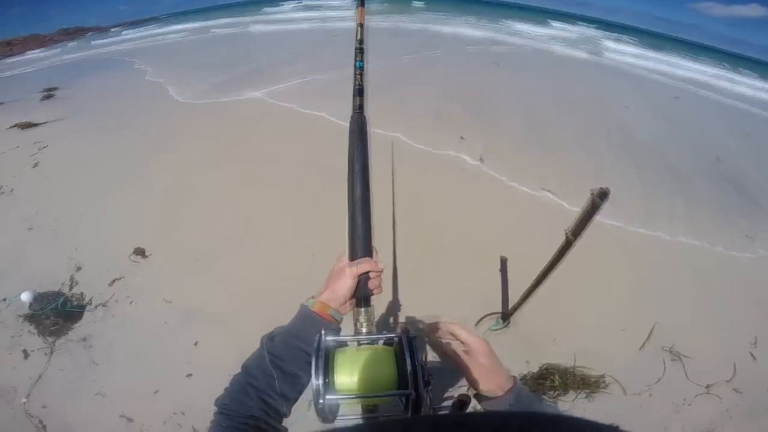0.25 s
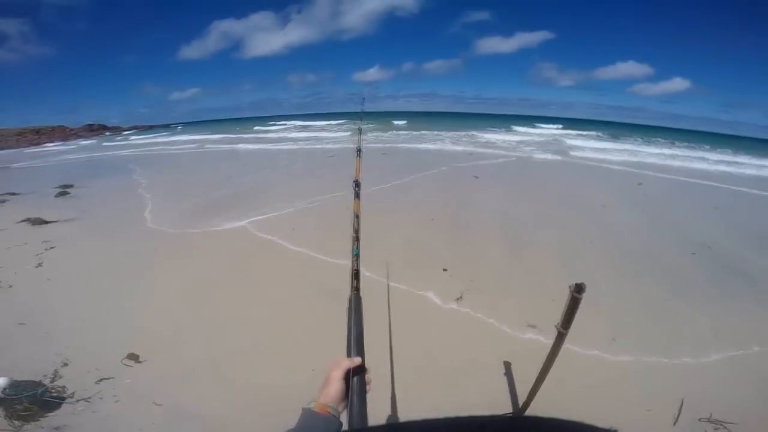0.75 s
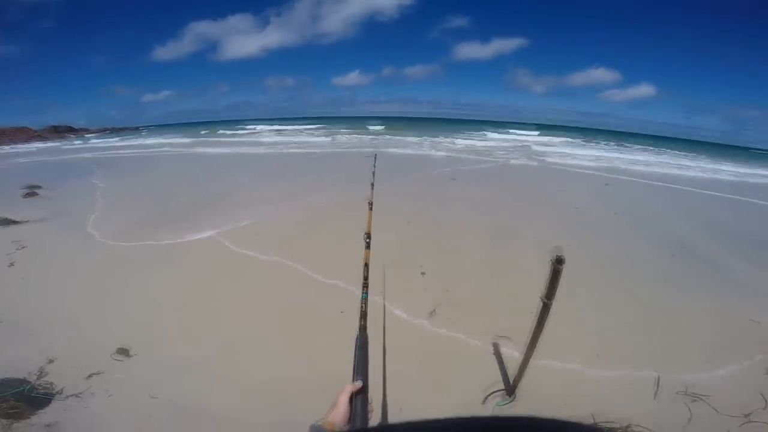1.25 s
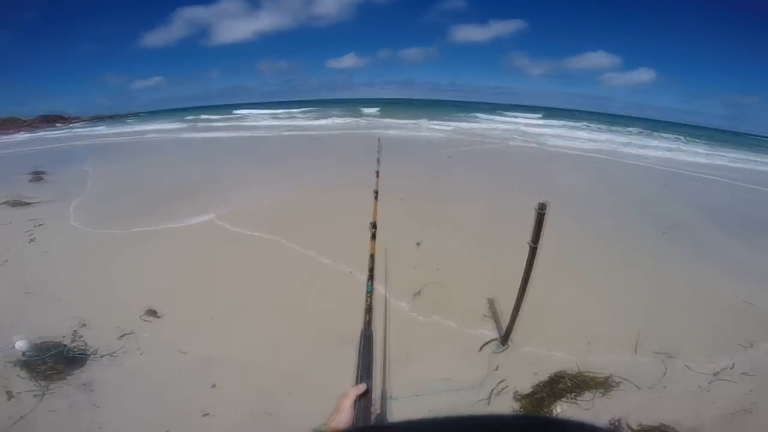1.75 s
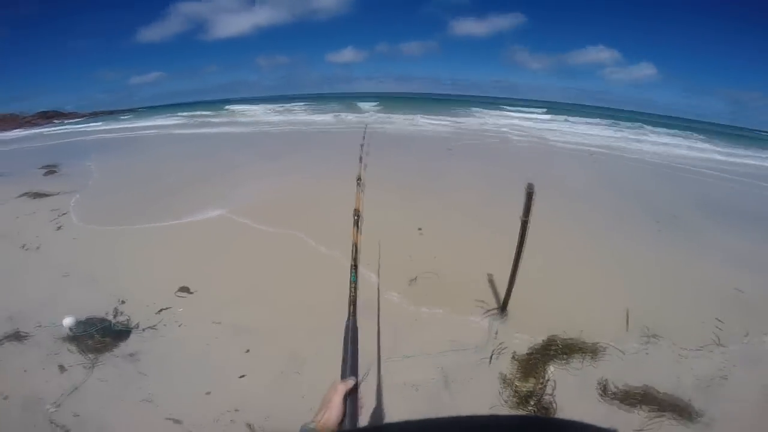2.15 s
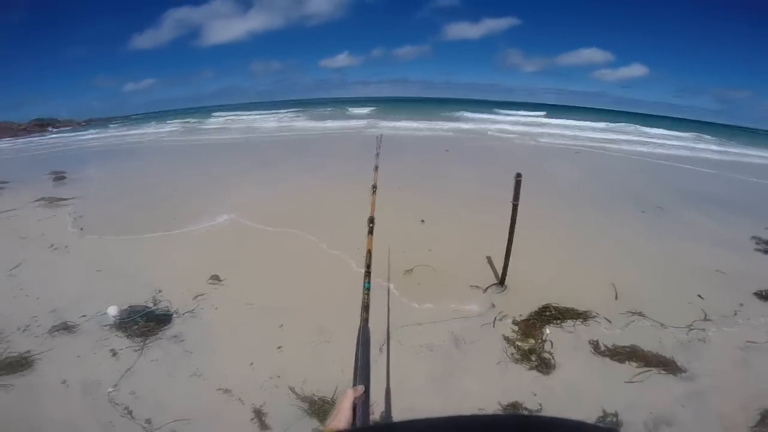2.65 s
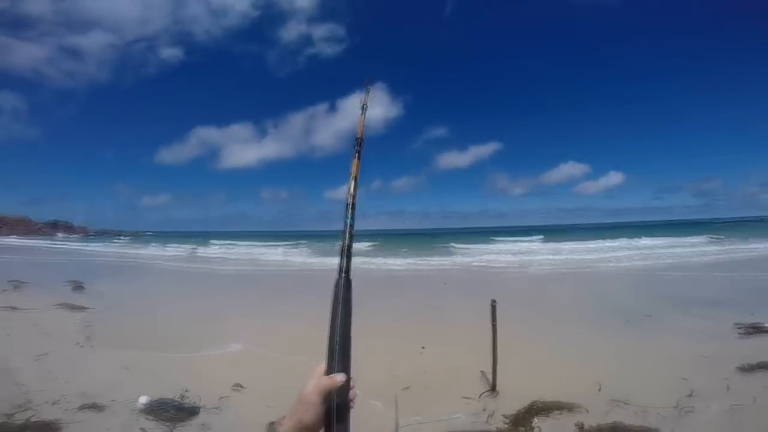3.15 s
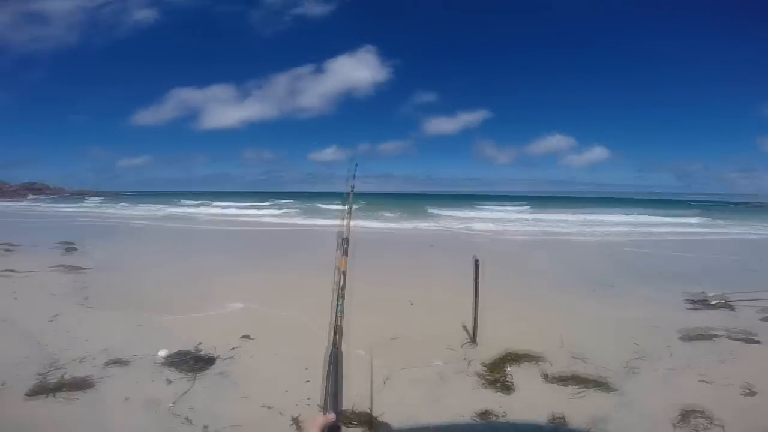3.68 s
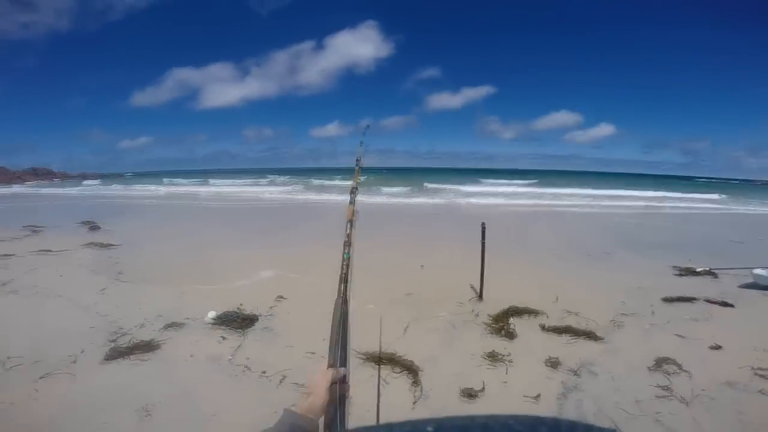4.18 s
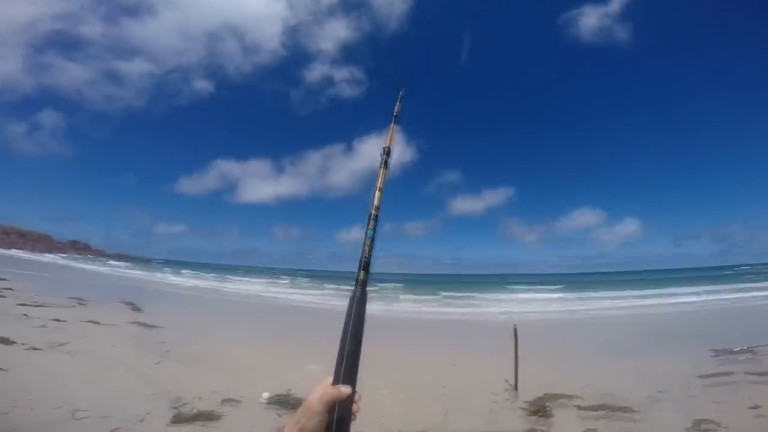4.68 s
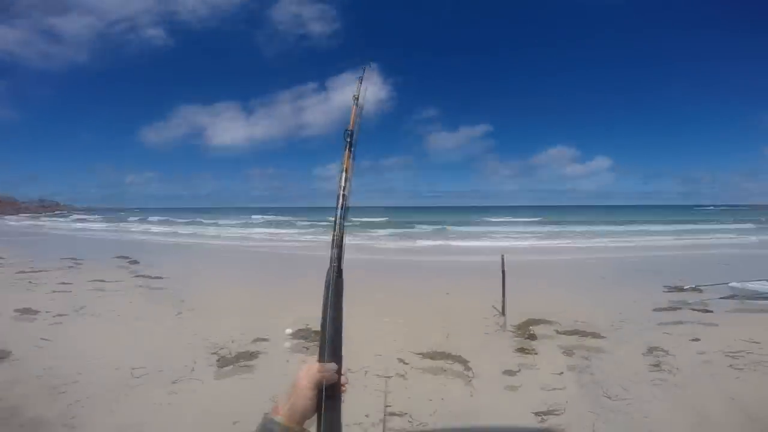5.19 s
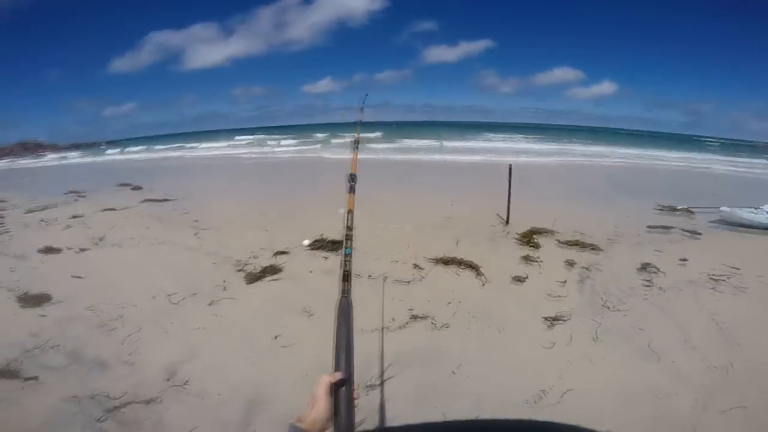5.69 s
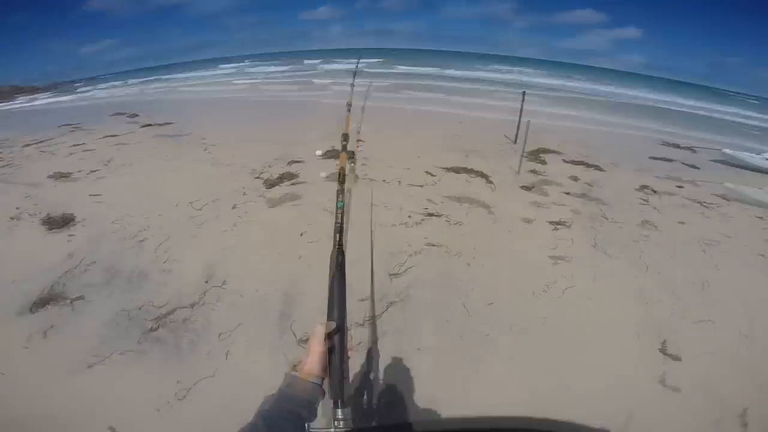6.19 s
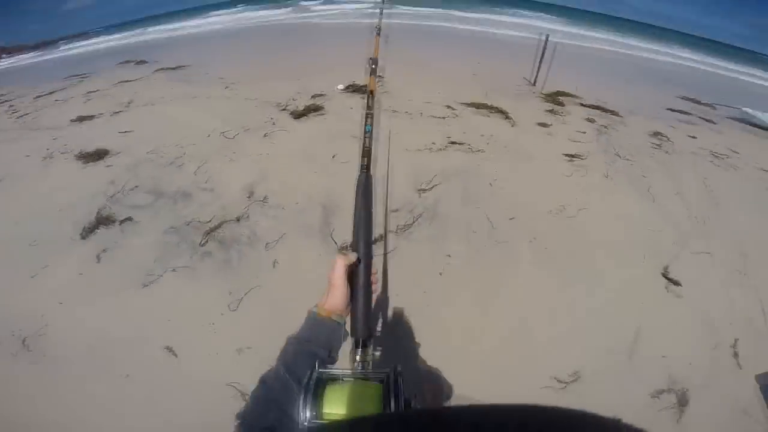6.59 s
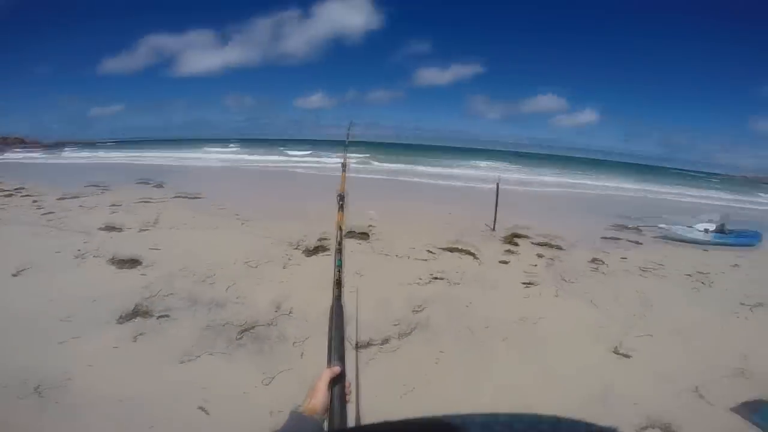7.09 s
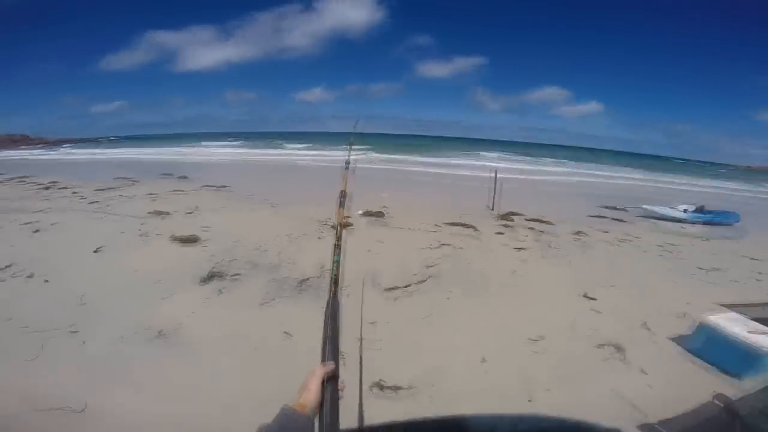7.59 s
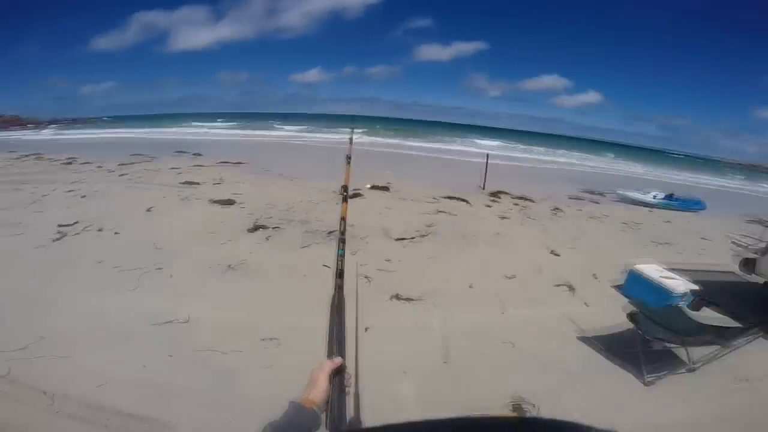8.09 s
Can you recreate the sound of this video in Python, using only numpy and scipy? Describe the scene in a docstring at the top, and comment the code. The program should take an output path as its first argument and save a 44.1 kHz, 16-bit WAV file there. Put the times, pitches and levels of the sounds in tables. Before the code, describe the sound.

On an open windy beach, a big metal fishing reel whirrs briefly and brakes to a stop. After a short gap, its clicker buzzes in uneven pulls, each rising and easing, with pauses in the middle. Rod knocks thud and clack, tackle ticks and a sleeve rasps near a body-worn microphone. Low wind gusts and steady, faint surf hiss lie behind, with no echo.

```python
"""Sea reel on a windy beach

A big reel spins freely and is braked, then line is drawn off it in separate pulls. A pawl snaps over an
off-centre ratchet wheel and rings rim, side plates and spool; the plates swell once per turn.
The rod butt knocks against the angler's body as he walks backwards, tackle ticks, and a sleeve rubs close
to the microphone. Shaped noise gives the wind rumble, the flapping jacket and the surf hiss behind."""
import sys
import numpy as np
from scipy import signal
from scipy.fft import rfft, irfft
from scipy.io import wavfile

SR = 44100
rng = np.random.default_rng(int(sys.argv[2]) if len(sys.argv) > 2 else 0)


def wav_out(sig):
    """Save sig, one row per channel (or a flat mono array), as 16-bit PCM at SR to the path in sys.argv[1]."""
    wavfile.write(sys.argv[1], SR, np.round(np.clip(np.atleast_2d(sig).T, -1, 1) * 32767).astype(np.int16))


N = 367794
TIME = np.arange(N) / SR  # s

# rumble through cloth: (frequency [Hz], relative density [dB])
JACKET_COLOUR = [(60, 3), (130, 0.5), (200, -3.5), (260, 4.5), (340, -15.5), (500, -19), (900, -26),
                 (2000, -66)]


def from_db(db):
    """Decibels to amplitude gain."""
    return 10 ** (np.asarray(db) / 20)


def rms_one(x):
    """Scale to unit power."""
    return x / np.sqrt(np.mean(x ** 2) + 1e-20)


def in_time(rows):
    """Interpolate each column of a time table at every sample."""
    s, *columns = np.transpose(rows)
    return [np.interp(TIME, s, column) for column in columns]


def drift(knots_per_s):
    """Random curve: straight lines between normal knots of spread 1."""
    knots = rng.standard_normal(6000)
    return np.interp(TIME * knots_per_s, np.arange(len(knots)), knots)


def noise(colour):
    """Noise of unit power with the given spectrum and steep skirts beyond its ends."""
    hz, db = np.transpose(colour)
    f = np.maximum(np.arange(N // 2 + 1) * SR / N, 1)
    low_skirt = 1 + (hz[0] / f / 2 ** .5) ** 8
    high_skirt = 1 + (f / hz[-1] / 2) ** 8
    gain = from_db(np.interp(np.log(f), np.log(hz), db)) / np.sqrt(low_skirt * high_skirt)
    return rms_one(irfft(rfft(rng.standard_normal(N)) * gain, N))


def impulses(times_s, sizes):
    """One impulse at each time."""
    index = np.round(np.asarray(times_s) * SR).astype(int)
    return np.bincount(np.clip(index, 0, N - 1), sizes, N)


def fade(x, decay_s):
    """Every impulse dies away exponentially from its own height."""
    return signal.lfilter([1], [1, -np.exp(-1 / (decay_s * SR))], x + 1e-18)


def chatter(hits, decay_s):
    """Each hit spread into a dying burst of micro-contacts of the same mean energy."""
    return rng.standard_normal(N) * np.sqrt(fade(hits ** 2, decay_s) / (decay_s * SR))


def resonate(x, modes):
    """Parallel two-pole resonances with alternating signs."""
    out = 0
    for k, (hz, width_hz, db) in enumerate(modes):
        r = np.exp(-np.pi * width_hz / SR)
        poles = [1, -2 * r * np.cos(2 * np.pi * hz / SR), r * r]
        gain = (-1) ** k * from_db(db) * (1 - r * r) / 2
        out = out + gain * signal.lfilter([1, 0, -1], poles, x + 1e-18)
    return out


def ring(x, modes, vary_db):
    """Resonances scaled to unit energy per unit impulse; the drive of each mode drifts separately."""
    out = 0
    for k, mode in enumerate(modes):
        drive = x * from_db(vary_db * drift(45))
        out = out + (-1) ** k * resonate(drive, [mode])
    return out / np.linalg.norm(resonate(signal.unit_impulse(SR // 10), modes))


def strike(x, modes):
    """Resonances in which a unit impulse rings with peak 1."""
    return resonate(x, modes) / np.abs(resonate(signal.unit_impulse(SR // 10), modes)).max()


def beach(jacket_db=-37, jacket_follows=0.4):
    """Lumpy wind on the port, the jacket flapping with the gusts, and nearly steady surf."""
    # wind strength on the port: (time [s], relative level [dB])
    gusts = [(0, -40.5), (.65, -35), (1.3, -35.5), (1.55, -27.5), (2.7, -34), (3.6, -34.5), (3.95, -23.5),
             (4.47, -41.5), (4.54, -19.5), (4.62, -19), (4.7, -30), (5.12, -44.5), (5.43, -25), (5.56, -42),
             (6.35, -24.5), (6.9, -33), (7.35, -28.5), (7.62, -36.5), (7.82, -21), (8, -38), (8.34, -29)]
    # surf: (time [s], level [dB])
    surf = [(0, -48), (.8, -51.5), (3.3, -51), (5.1, -52), (8.34, -48.5)]
    # spectra: (frequency [Hz], relative density [dB])
    wind_colour = [(20, 6.5), (35, -4), (50, -10.5), (70, -19.5), (110, -31.5), (200, -46.5), (500, -60)]
    surf_colour = [(300, -2), (500, -8.5), (900, -11), (1500, -9), (2200, -6.5), (3100, -7), (3900, -17),
                   (4700, -21), (5400, -15), (6300, -15.5), (7500, -26.5), (10000, -28.5), (12500, -34),
                   (15000, -40)]
    gust_db, = in_time(gusts)
    surf_db, = in_time(surf)
    wind = from_db(gust_db + 2.5) * noise(wind_colour)
    flap_db = jacket_db + jacket_follows * gust_db + 5.5 * drift(35)
    return wind + from_db(flap_db) * noise(JACKET_COLOUR) + from_db(surf_db) * noise(surf_colour)


def sleeve():
    """Cloth slides in short strokes: a grainy rasp, and a rumble through the jacket."""
    # strokes of sleeve and hand: (time [s], Gaussian half length [s], rasp level [dB], rumble level [dB])
    rubs = [(0.272, 0.0043, -30.5, -50), (0.344, .004, -44, -53), (3.176, 0.033, -46, -36.5),
            (3.284, 0.0066, -45, -44), (3.341, 0.017, -47, -53), (4.53, 0.036, -43.5, -42),
            (4.85, 0.014, -41, -39.5), (5.37, 0.066, -60, -43.5), (6.478, 0.015, -32, -29),
            (6.541, 0.015, -30.5, -35), (6.807, 0.018, -31, -39.5), (6.865, 0.0099, -21, -49),
            (7.33, 0.043, -40, -34.5)]
    # rasp spectrum: (frequency [Hz], relative density [dB])
    rub_colour = [(200, -19), (600, -19), (900, -11.5), (1500, -3), (2600, -1), (3300, -14.5), (5000, -24),
                  (14000, -49)]
    strokes = [np.exp(-.5 * ((TIME - s) / length_s) ** 2) for s, length_s, _, _ in rubs]
    rasp, rumble = from_db(np.array(rubs)[:, 2:].T) @ np.array(strokes)
    grain = from_db(3.5 * drift(600))
    return rasp * rms_one(noise(rub_colour) * grain) + rumble * noise(JACKET_COLOUR)


def ticks():
    """Small hard parts of the tackle touch and ring briefly."""
    # touches: (time [s], level [dB])
    touches = [(3.182, -47), (3.223, -37), (4.487, -22.5), (4.838, -43)]
    # tackle resonances: (frequency [Hz], width [Hz], relative level [dB])
    tick_modes = [(2880, 900, -2), (6520, 260, 10), (7640, 1000, -31.5)]
    s, db = np.transpose(touches)
    touch = impulses(s, from_db(db))
    return strike(touch + 0.5 * chatter(touch, 0.0019), tick_modes)


def knocks(soft_hz=1100, dull_hz=3600, slack_s=0.00069):
    """A padded push thuds through the body while the reel seat clacks twice in its play."""
    # rod knocks: (time [s], relative thud level [dB], relative clack level [dB])
    rod_knocks = [(1.571, -14, -20.5), (1.671, -16.5, -20), (1.937, -21, -32), (2.209, -9.5, -16.5),
                  (2.473, -14.5, -19), (3.527, -17.5, -33), (3.868, -6.5, -12.5), (4.002, -10.5, -19.5),
                  (4.057, -16, -25), (5.648, -20.5, -37), (6.2092, -2, -8), (6.327, -4.5, -7),
                  (6.459, -12.5, -33), (7.304, -18, -31), (7.441, -18, -26), (7.827, -6.5, -9),
                  (8.067, -21.5, -13.5), (8.072, -11, -34), (8.103, -10.5, -40)]
    # resonances of body and rod: (frequency [Hz], width [Hz], relative level [dB])
    thud_modes = [(48, 34.4, 9), (82, 42.6, 0.5), (156, 36, -10.5), (258.5, 79.5, -0.5), (388, 135, -9),
                  (566, 210, -14.5), (950, 240, -12.5)]
    clack_modes = [(970, 73, -46), (1620, 240, -3.5), (2200, 188, -0.5), (2445, 300, -3)]
    s, thud_db, clack_db = np.transpose(rod_knocks)
    push = impulses(s + 0.00055, from_db(thud_db))
    thud = strike(push + 0.19 * chatter(push, 0.014), thud_modes)
    thud = signal.sosfilt(signal.butter(2, soft_hz, fs=SR, output="sos"), thud)
    clack = impulses(s, from_db(clack_db)) + 0.22 * impulses(s + slack_s, from_db(clack_db))
    clack = clack + 0.65 * chatter(clack, 0.00021) + 0.47 * chatter(clack, 0.0082)
    clack = strike(clack, clack_modes)
    clack = signal.sosfilt(signal.butter(2, dull_hz, fs=SR, output="sos"), clack)
    return from_db(-2) * thud + from_db(2.5) * clack


def spin_teeth():
    """Tooth times [s] while the spool coasts; it is braked to rest on a tooth."""
    start_s, stop_s = .003, .283
    teeth_per_s, coast_teeth_per_s2, brake_teeth_per_s2 = 186, 79, 8000
    t = np.arange(start_s, stop_s, 1 / SR)
    coasting = teeth_per_s - coast_teeth_per_s2 * (t - t[0])
    braking = brake_teeth_per_s2 * (stop_s - t)
    turned = np.cumsum(np.minimum(coasting, braking)) / SR
    return np.interp(np.arange(round(turned[-1]) + 1), turned, t)


def pull_teeth(ease_s=.109):
    """Tooth times [s] of pulls that speed the spool up and ease off, each over a whole number of teeth."""
    # pulls, each until the next row; drive 0 stops the spool:
    # (time [s], speed at the start [teeth/s], drive [teeth/s], rise [s])
    pulls = [(0.853, 32, 79, 0.22), (1.091, 52, 115, 0.3), (1.269, 54, 131, 0.2), (1.435, 80, 112, 0.06),
             (1.564, 67, 127, 0.11), (1.829, 72, 120, 0.09), (2.082, 74, 123, 0.16), (2.354, 59, 165, 0.18),
             (2.486, 70, 109, 0.2), (2.65, 69, 97, 0.1), (2.972, 70, 111, 0.15), (3.149, 44, 0, 0),
             (3.412, 25, 97, 0.07), (3.579, 60, 165, 0.33), (3.846, 49, 119, 0.12), (4.136, 34, 127, 0.06),
             (4.344, 42, 0, 0), (5.17, 52, 78, 0.09), (5.283, 50, 104, 0.1), (5.594, 26, 103, 0.08),
             (5.732, 57, 112, 0.11), (5.943, 52, 131, 0.07), (6.202, 38, 135, 0.03), (6.438, 40, 138, 0.11),
             (6.696, 44, 114, 0.09), (6.989, 34, 117, 0.07), (7.255, 42, 113, 0.15), (7.567, 27, 112, 0.31),
             (7.932, 26, 122, 0.15), (8.253, 23, 133, 0.12), (8.335, 130, 0, 0)]
    times = []
    for (start, speed_in, drive, rise_s), (end, speed_out, next_drive, _) in zip(pulls, pulls[1:]):
        if drive > 0:
            t = np.arange(start, end, 1 / SR)
            progress = np.minimum([(t - start) / rise_s, (end - t) / ease_s], 1)
            rise, ease = np.sin(np.pi / 2 * progress)
            speeding_up = speed_in + (drive - speed_in) * rise
            easing_off = speed_out + (drive - speed_out) * ease
            turned = np.cumsum(np.minimum(speeding_up, easing_off)) / SR
            teeth = round(turned[-1])
            # the last tooth belongs to the next pull unless the spool stops
            count = np.arange(teeth + (next_drive == 0))
            times.append(np.interp(count / teeth, turned / turned[-1], t))
    return np.concatenate(times)


def drops(lead_s=.0003, wobble_db=2, wobble_s=.00013):
    """Pawl drop times [s] and strengths [dB]: both waver once per turn; a fast spool has less jitter."""
    wheel_teeth, high_tooth = 14, 11.5  # off-centre wheel: plates ring hardest at the high tooth
    runs = spin_teeth(), pull_teeth()
    at = np.concatenate(runs)
    tooth = np.concatenate([np.arange(len(run)) for run in runs])
    teeth_per_s = 1 / np.gradient(at)
    angle = 2 * np.pi * (tooth - high_tooth) / wheel_teeth
    jitter_s = np.interp(teeth_per_s, [60, 110, 160], [.00025, .0001, .00002])
    late_s = wobble_s * np.sin(angle) + jitter_s * rng.standard_normal(len(at))
    return at - lead_s + late_s, wobble_db * np.cos(angle)


def scatter(x):
    """Waves run to and fro in the metal frame and smear every snap in the same way (all-pass loops)."""
    # round trips in the frame: (delay [s], share sent round again [ratio])
    frame_paths = [(.00014, .55), (.00034, .5), (.00077, -.3)]
    for delay_s, share in frame_paths:
        loop = np.r_[1, np.zeros(round(delay_s * SR) - 1), -share]
        x = signal.lfilter(loop[::-1], loop, x + 1e-18)
    return x


def snaps(at, size, chatter_s, rattle_s, rattle):
    """A snap alike on every tooth plus chatter and loose rattle; at speed the pawl settles to a cleaner whine."""
    teeth_per_s = 1 / np.gradient(at)
    loose = np.interp(teeth_per_s, [90, 130, 170], [.57, .48, .32])
    alike = impulses(at, size * np.sqrt(1 - loose ** 2))
    stray = impulses(at, size * loose)
    return scatter(alike + chatter(stray, chatter_s)) + rattle * chatter(stray, rattle_s)


def ratchet(uneven_db=0.45, lag_s=.0005, hard_db=-33, bright_hz=9000):
    """Each drop of the pawl rings the rim at once, the side plates and the spool a moment later."""
    # relative levels at 100 teeth/s; rim brightest when the reel swings out before the microphone:
    # (time [s], side plates [dB], rim [dB], spool [dB])
    pawl = [(.2, -45, -34, -52.5), (.9, -46.5, -42.5, -43), (1.12, -45.5, -42.5, -44),
            (1.24, -38.5, -41.5, -44.5), (2, -35.5, -41, -48.5), (2.85, -39.5, -40.5, -45),
            (3.5, -33.5, -40, -46.5), (4.1, -36, -41.5, -46), (5.3, -33, -38, -50), (5.7, -34.5, -40, -48),
            (6.3, -34, -40, -49.5), (6.6, -37, -34, -46.5), (6.9, -35, -39.5, -47),
            (8.3, -35, -40.5, -47.5)]
    # reel resonances: (frequency [Hz], width [Hz], relative level [dB])
    plate_modes = [(1191, 163, -4.5), (1561, 179, 1.5), (1772, 166, 2.5), (2288, 163, -1), (2673, 142, -3)]
    rim_modes = [(2835, 185, 2.5), (3186, 360, -2), (3662, 60, 2.5), (4170, 230, -2.5), (4546, 47, -2),
                 (5320, 255, -1), (5620, 106, -4), (6178, 245, 1), (6640, 90, -13.5), (8040, 100, -14),
                 (9400, 780, -13), (9610, 260, -6.5), (11050, 2900, -20), (12930, 450, -16.5),
                 (14550, 1000, -28)]
    spool_modes = [(998.3, 49, 7.5), (1090, 132, 0.5)]
    at, turn_db = drops()
    s, plate_db, rim_db, spool_db = np.transpose(pawl)
    force = np.sqrt(SR / 100) * from_db(uneven_db * rng.standard_normal(len(at)))
    plate = force * from_db(np.interp(at, s, plate_db) + turn_db)
    rim = force * from_db(np.interp(at, s, rim_db))
    spool = force * from_db(np.interp(at, s, spool_db))

    rim_snap = snaps(at, rim, chatter_s=0.0024, rattle_s=0.0021, rattle=1.0)
    # a harder snap has a shorter contact, and so more top
    hardness = from_db(np.interp(TIME, s, rim_db) - hard_db) ** 2
    top = signal.sosfilt(signal.butter(1, bright_hz, "high", fs=SR, output="sos"), rim_snap)
    rim_ring = ring(rim_snap + 0.55 * hardness * top, rim_modes, vary_db=2.0)

    plate_snap = snaps(at + lag_s, plate, chatter_s=0.0011, rattle_s=0.005, rattle=0.68)
    plate_ring = ring(plate_snap, plate_modes, vary_db=1.35)

    spool_snap = snaps(at + lag_s, spool, chatter_s=0.012, rattle_s=0.016, rattle=0.62)
    spool_hum = ring(spool_snap, spool_modes, vary_db=0.0)
    return plate_ring + 0.82 * rim_ring + spool_hum


def scene():
    """Sum of all sources in the open air, without echo; one channel."""
    return (beach() + sleeve() + ticks() + knocks() + ratchet())[None]


def record(dry):
    """The highest peaks are rounded and the top is cut."""
    ceiling, cutoff_hz = .95, 15600
    rounded = dry / (1 + (dry / ceiling) ** 8) ** (1 / 8)
    return signal.sosfilt(signal.ellip(10, .2, 80, cutoff_hz, fs=SR, output="sos"), rounded)


dry = scene()
out = record(dry)
wav_out(out)
```